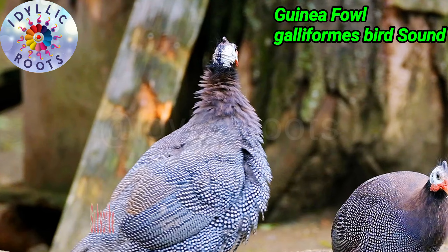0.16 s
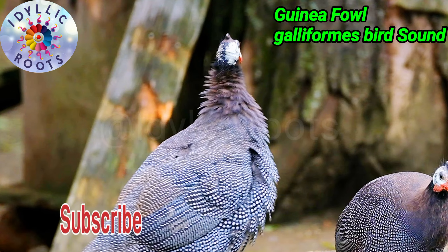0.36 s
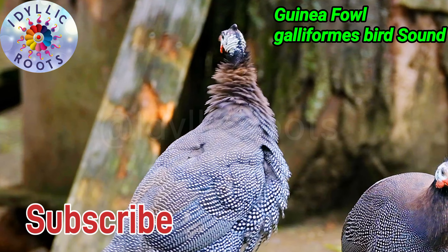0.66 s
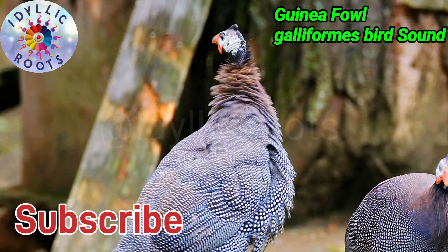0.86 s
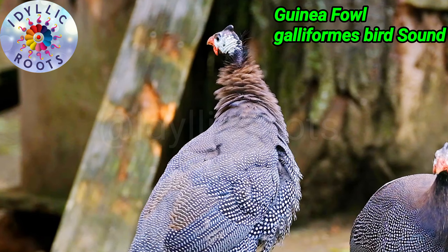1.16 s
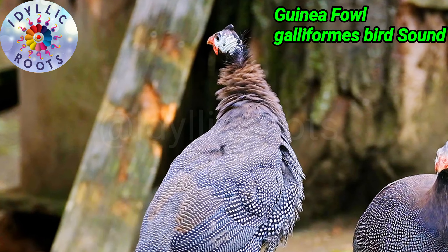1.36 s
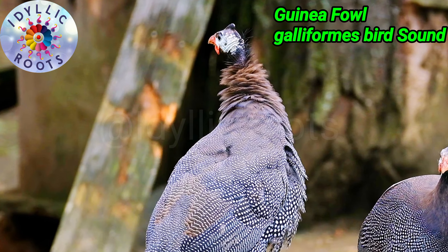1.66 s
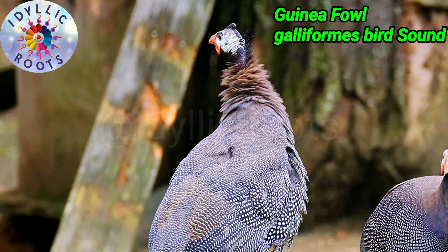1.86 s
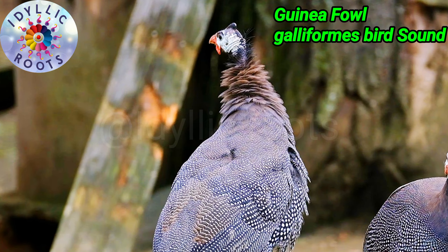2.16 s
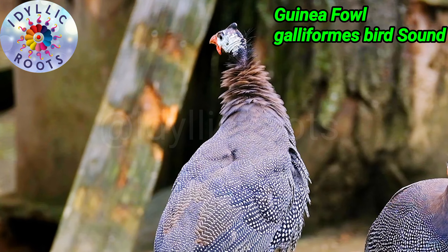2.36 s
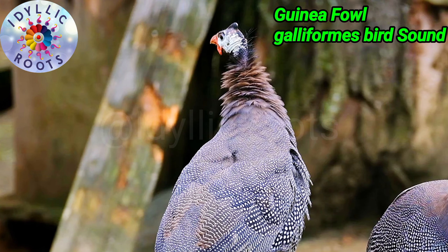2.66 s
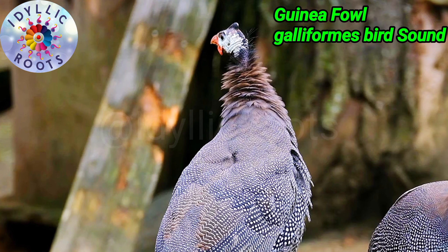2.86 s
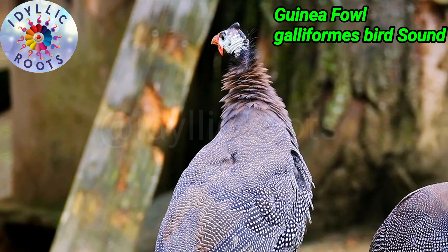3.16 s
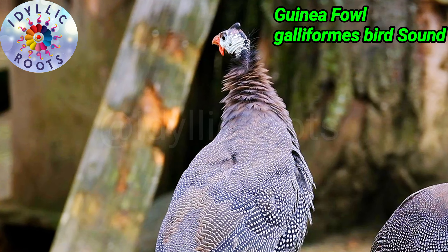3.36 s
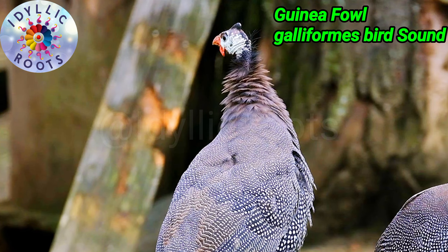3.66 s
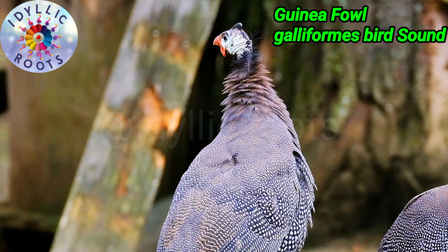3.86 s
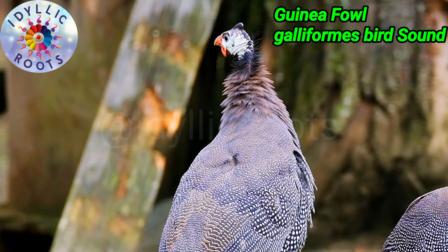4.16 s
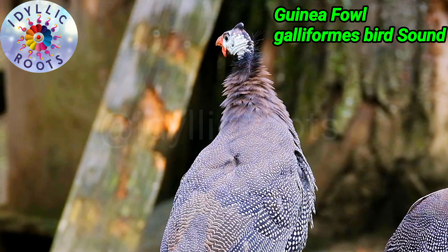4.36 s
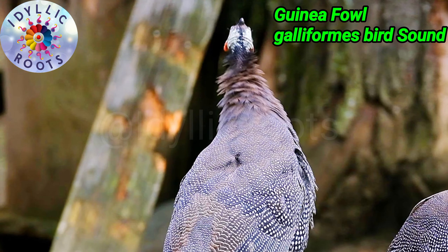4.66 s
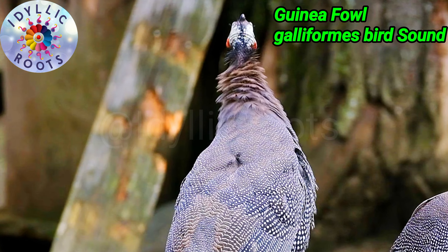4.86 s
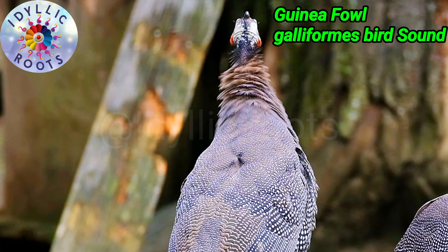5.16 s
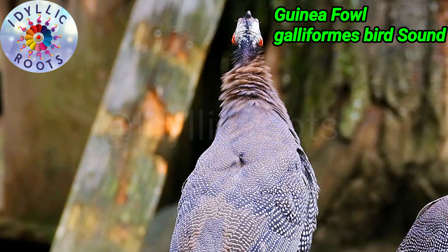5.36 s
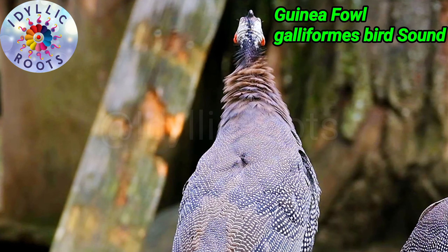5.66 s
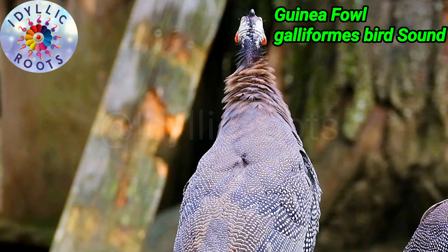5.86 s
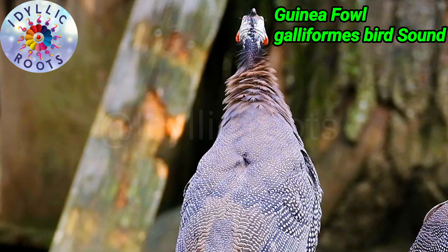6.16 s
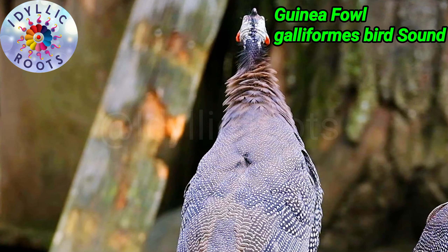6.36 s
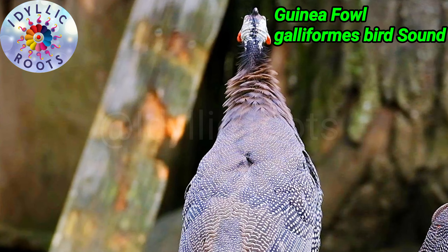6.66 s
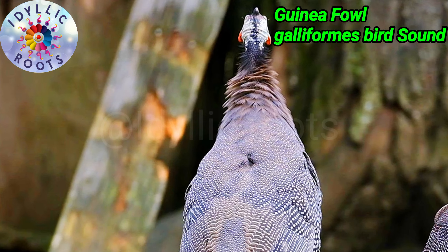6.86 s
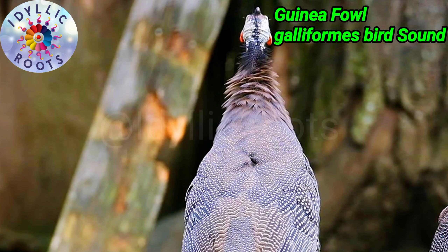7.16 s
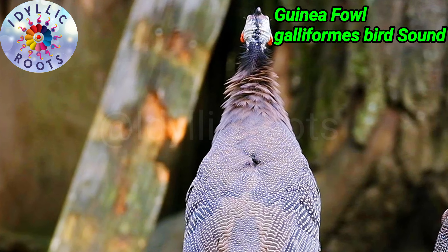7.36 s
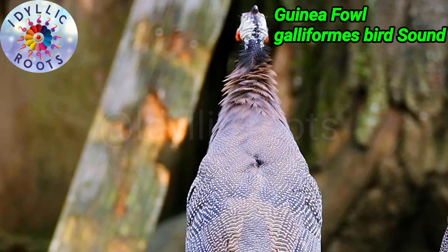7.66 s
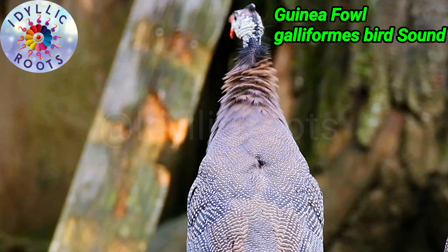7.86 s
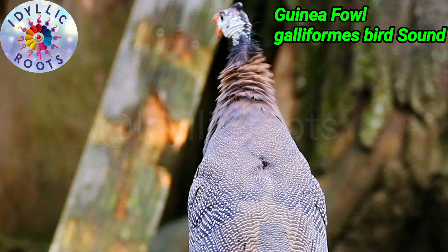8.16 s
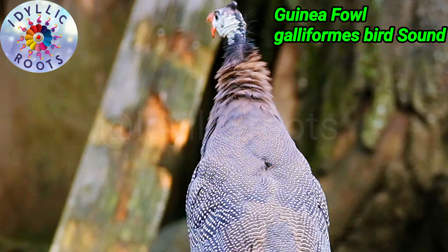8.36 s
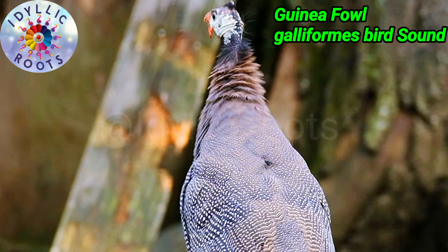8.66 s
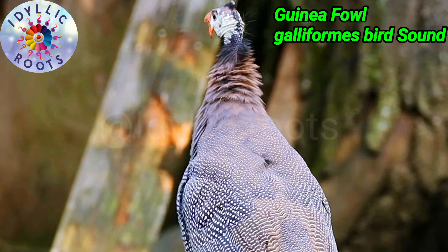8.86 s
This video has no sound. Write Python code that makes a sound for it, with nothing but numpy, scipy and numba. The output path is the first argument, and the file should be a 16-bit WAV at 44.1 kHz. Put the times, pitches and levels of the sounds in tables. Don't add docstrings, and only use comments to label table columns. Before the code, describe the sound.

A guineafowl close by repeats harsh, chopped rattling notes about four per second outdoors, pauses briefly, then resumes as a second bird answers with rasps.

```python
import sys
import numpy as np
from scipy import signal
from scipy.fft import rfft, irfft
from scipy.io import wavfile
from scipy.ndimage import uniform_filter1d, minimum_filter1d
from numba import njit

SR = 44100
rng = np.random.default_rng(int(sys.argv[2]) if len(sys.argv) > 2 else 0)


def gain_from_decibels(decibels):
    exponent = np.asarray(decibels, float) / 20
    return 10 ** exponent


def output_pcm(signal):
    pcm = np.clip(np.atleast_2d(signal).T, -1, 1) * 32767
    wavfile.write(sys.argv[1], SR, np.round(pcm).astype(np.int16))


N = 396900
T = np.arange(N) / SR

# t/s, throat f/Hz at the end of a note, treble level/dB from facing the microphone
POSTURE = [(0, 1700, -0.7), (1.8, 1640, 0), (2.2, 1840, 1), (2.8, 1649, -0.5), (3.3, 1661, 4),
           (3.7, 1807, -8), (4.4, 1820, -11), (5.1, 1984, -5), (5.7, 1819, -5), (6.1, 2060, -3.5),
           (6.9, 2104, -6.5), (7.15, 1790, -1), (7.7, 1870, -6), (9, 1830, -9)]


def colour(x, points):
    hz, db = np.transpose(points)
    gain_db = np.interp(np.log(np.linspace(1, SR / 2, 1025)), np.log(hz), db)
    cepstrum = irfft(np.log(gain_from_decibels(gain_db)))
    cepstrum[1:1024] *= 2
    cepstrum[1025:] = 0
    return signal.fftconvolve(x, irfft(np.exp(rfft(cepstrum))))[:N]


def above(x, hz):
    share = np.clip((np.fft.rfftfreq(N, 1 / SR) / hz - .93) / .14, 0, 1)
    return irfft(rfft(x) * share, N)


def unit(x):
    return x / np.sqrt(np.mean(x ** 2))


def walk(rate_hz):
    hold = int(SR / rate_hz)
    steps = np.repeat(rng.standard_normal(N // hold + 1), hold)
    return unit(uniform_filter1d(steps, hold)[:N])


@njit
def svf(x, hz, width_hz):
    y, band, low = np.empty(len(x)), 0., 0.
    for i in range(len(x)):
        g, damping = np.tan(np.pi * hz[i] / SR), width_hz / hz[i]
        v = (band + g * (x[i] - low)) / (1 + g * (g + damping))
        band, low, y[i] = 2 * v - band, low + 2 * g * v, damping * v
    return y


def tail(t60_s, length_s=.6):
    t = T[:int(length_s * SR)]
    return rng.standard_normal(len(t)) * gain_from_decibels(-60 * t / t60_s) * np.sqrt(np.log(1000) / t60_s / SR)


def membrane(hz, jitter, scatter_db, duty):
    phase = np.cumsum(hz * (1 + jitter * walk(300))) / SR
    size = gain_from_decibels(scatter_db * rng.standard_normal(N // 40))[phase.astype(int)]
    return phase, size * np.exp(-(phase % 1) / duty)


def flock():
    # t/s, level/dB
    flock_level = [(0, -40), (.2, -32.5), (.9, -36.5), (1.32, -41.5), (1.9, -36.5), (2.3, -38),
                   (3.0, -42.5), (3.41, -52), (3.69, -65), (3.72, -31.5), (3.96, -24), (4.15, -27.5),
                   (4.5, -28), (4.75, -32), (6, -35), (6.4, -31), (7.6, -30.5), (9, -30)]
    # f/Hz, level/dB
    flock_colour = [(1100, -18), (1400, -17), (1600, -3), (1760, -6), (1950, 0), (2100, -4), (2300, -14),
                    (2550, -11), (2850, -16), (3250, -10), (3900, -9), (4250, -14), (4700, -11),
                    (7100, -26)]
    db = np.interp(T, *np.transpose(flock_level))
    voices = sum(membrane(hz + 0 * T, .02, 3, .05)[1] * gain_from_decibels(4 * walk(9)) for hz in (318, 385, 394))
    blur = signal.fftconvolve(np.diff(voices, prepend=0), tail(.079))[:N]
    breath = .7 * rng.standard_normal(N)
    drone = unit(colour(unit(blur) + breath, [(600, -24)] + flock_colour + [(7800, -66)]))
    hiss_colour = [(6000, -19), (8000, -8.5), (12000, -4.5), (14500, -14), (15500, -47)]
    hiss = unit(colour(rng.standard_normal(N), hiss_colour))
    murmur = unit(colour(rng.standard_normal(N), [(200, -31.5), (350, .5), (800, 0), (1200, -33)]))
    hiss += gain_from_decibels(-5.5) * murmur
    hiss_db = -54 + .96 * (db + 33.5) + 1.2 * walk(7.2)
    return drone * gain_from_decibels(db + 2.2 * walk(6.4)) + hiss * gain_from_decibels(hiss_db)


def air():
    # f/Hz, level/dB
    air_colour = [(18, -65), (30, -43), (123, -6.5), (663, -24), (727, -14), (1180, -4.5), (1270, -3),
                  (5680, -12), (6090, -11), (7500, -10), (9750, -69), (16500, -120)]
    return gain_from_decibels(-48 + .98 * walk(2.4)) * unit(colour(rng.standard_normal(N), air_colour))


def insect():
    return gain_from_decibels(-50.5) * unit(svf(rng.standard_normal(N), 6350 + 60 * walk(4), 200.)) * (T < 3.71)


def whistle(hz, chop, waver, overtones):
    phase = 2 * np.pi * np.cumsum(hz * (1 + waver * walk(250))) / SR
    tone = 0
    for k, db in overtones:
        swing_db = 1.5 if k == 1 else 3.5
        tone = tone + gain_from_decibels(db + swing_db * walk(90)) * np.sin(k * phase)
    puff = membrane(340 + 0 * hz, .03, 1.5, .5)[1]
    return unit(tone * (1 + chop * unit(puff - puff.mean())))


def rattle(hz, throat_hz, jitter, rough):
    # f/Hz, width/Hz, level/dB
    head_modes = [(794, 140, -38.5), (1283, 420, -17.5), (7600, 3600, -16.5), (2437, 200, -9),
                  (3210, 850, -4), (3930, 205, -8), (4520, 162, -8), (5068, 154, -13), (5305, 130, -14.5),
                  (6130, 1050, -10), (8660, 590, -19.5), (10590, 610, -14.5), (11640, 200, -18),
                  (12270, 370, -13.5), (13670, 1600, -20)]
    phase, puff = membrane(hz, jitter, 1.4, 1.0)

    def swing():
        return gain_from_decibels(3 * walk(60))

    snap = unit(np.maximum(np.diff(puff, prepend=0), 0))
    drive = snap + rough * unit(puff * rng.standard_normal(N))
    head = np.zeros(N)
    for k, (f_hz, width_hz, db) in enumerate(head_modes):
        mode = unit(svf(drive, f_hz * (1 + .018 * walk(30)), 1. * width_hz))
        head += (-1) ** k * gain_from_decibels(db) * swing() * mode
    throat = svf(svf(drive, throat_hz, 310.), throat_hz, 310.)
    hum = np.sin(2 * np.pi * phase)
    grunt = np.sin(6 * np.pi * phase) * swing()
    return unit(head), unit(throat * swing()), hum, grunt


def bird(notes, overtones):
    # t/s, squeak f/Hz, squeak level/dB re whistle, squeak length/s, neck grunt level/dB re rattle
    lead_in = [
        (0, 3700, -17, 0.0033, -65),
        (3.5, 3673, -54, 0.0053, -28),
        (3.7, 3344, -5, 0.0062, -24.5),
        (9, 3340, 0, 0.0056, -24),
    ]
    # t/s, throat ring at note end as share of rattle, attack/s
    settling = [
        (0, .5, .007),
        (3.5, .42, .007),
        (3.7, .8, .011),
        (9, .8, .011),
    ]
    tone_gain, head_gain, throat_gain, hum_gain, grunt_gain, lead, sag, flare = np.zeros((8, N))
    lead_s, lead_hz, lead_db, lead_length, grunt_db = np.transpose(lead_in)
    settle_s, ring_share, attack_s = np.transpose(settling)
    for s, length, _, tone_db, _, rattle_db in notes:
        at = slice(int((s - .03) * SR), int((s + .098) * SR))
        t = T[at] - s
        ring, attack = np.interp(s, settle_s, ring_share), np.interp(s, settle_s, attack_s)
        rise = np.clip((t + attack - .004) / attack, 0, 1)
        gate = rise * gain_from_decibels(-900 * np.maximum(t - length, 0))
        late_fall = gain_from_decibels(-1400 * np.maximum(t - length - .01, 0))
        tone_shape = np.interp(t / length, [0, .4, .52, 1], [1.25, .8, .22, .12])
        tone_gain[at] += gain_from_decibels(tone_db) * gate * tone_shape
        head_gain[at] += gain_from_decibels(rattle_db) * gate * np.interp(t / length, [0, .4, 1], [.75, .75, .56])
        flare_db = tone_db - 4.5 + 2.5 * rng.standard_normal()
        flare_shape = np.clip((t + .0066) / .0052, 0, 1) * np.exp(-np.maximum(t, 0) / .014)
        flare[at] += gain_from_decibels(flare_db) * flare_shape
        throat_shape = np.interp(t / length, [0, .4, .6, 1], [.7, .5, .8 * ring, ring])
        throat_gain[at] += gain_from_decibels(rattle_db) * rise * late_fall * throat_shape
        grunt_rise = np.clip(t / .0048 + 2.4, 0, 1)
        grunt_gain[at] += gain_from_decibels(rattle_db + np.interp(s, lead_s, grunt_db)) * grunt_rise * late_fall
        hum_gain[at] += gain_from_decibels(rattle_db - 26.5) * gate * np.clip(t / length - .2, 0, .7)
        swell = np.exp(np.minimum(t, 0) / np.interp(s, lead_s, lead_length)) * np.clip(1 - t / .021, 0, 1)
        lead[at] += gain_from_decibels(tone_db + np.interp(s, lead_s, lead_db)) * swell * (t > -.016)
        droop = np.clip((t - length + .008) / .025, 0, 1) * (t < length + .04)
        sag[at] = np.maximum(sag[at], droop)

    s, length, tone_hz, _, throat_hz, _ = np.transpose(notes)
    pitch = np.interp(T, np.ravel([s, s + length], "F"), np.ravel([1.005 * tone_hz, .98 * tone_hz], "F"))
    knots_s = np.ravel([s, s + .44 * length, s + .52 * length, s + length], "F")
    knots_hz = np.ravel([1.224 * tone_hz, 1.215 * tone_hz, throat_hz, throat_hz], "F")
    throat_hz = np.interp(T, knots_s, knots_hz) * (1 - .05 * sag)
    membrane_hz = (384 + 4 * walk(6)) * (1 - .1 * sag)
    head, throat, hum, grunt = rattle(membrane_hz, throat_hz, .018, .6)
    squeak_hz = np.interp(T, lead_s, lead_hz) * (1 + .03 * walk(90))
    squeak = np.sin(2 * np.pi * np.cumsum(squeak_hz) / SR) * (1 + .7 * walk(700))
    octave = np.sin(4 * np.pi * np.cumsum(pitch * (1 + .012 * walk(200))) / SR) * gain_from_decibels(3 * walk(300))
    out = flare * octave + tone_gain * whistle(pitch, .11, .008, overtones) + lead * squeak
    return out + head_gain * head + throat_gain * throat + hum_gain * hum + grunt_gain * grunt


def voiced(rows, throat_hz):
    return [(s, length, hz, db, throat_hz(s), -7 + .98 * (db + 10)) for s, length, hz, db in rows]


def near_bird():
    # t/s, length/s, whistle f/Hz, effort level/dB
    first_bout = [(0.092, .075, 1593, -10.5), (0.391, .072, 1547, -9), (0.697, 0.075, 1606, -11),
                  (0.971, 0.074, 1610, -11), (1.374, 0.067, 1609, -10.5), (1.771, 0.065, 1567, -9),
                  (2.042, .065, 1604, -10), (2.279, 0.073, 1621, -12), (2.527, .072, 1640, -9),
                  (2.787, 0.075, 1613, -11.5), (3.034, 0.072, 1635, -12), (3.27, .069, 1586, -13.5)]
    # t/s, length/s, whistle f/Hz, effort level/dB
    second_bout = [(3.76, .075, 1656, -11), (4.031, .061, 1656, -10.5), (4.33, .062, 1675, -7.5),
                   (4.608, .062, 1672, -11), (4.839, .067, 1670, -8), (5.079, .062, 1661, -7.5),
                   (5.333, .059, 1687, -8), (5.58, .06, 1674, -8), (5.849, .061, 1663, -8.5),
                   (6.1, .046, 1695, -5), (6.377, .069, 1682, -7), (6.634, .074, 1689, -3),
                   (6.878, .069, 1686, -1), (7.144, .074, 1678, -5.5), (7.376, .08, 1705, -7),
                   (7.651, .071, 1693, -7.5), (7.906, .061, 1665, -6), (8.158, .06, 1675, -6),
                   (8.416, .069, 1655, -8.5), (8.66, .055, 1672, -7), (8.93, .06, 1660, -8)]
    # multiple, level/dB
    full_overtones = [(1, 4), (2, -8), (3, -13.5), (4, -17), (5, -41)]
    posture_s, throat_hz, _ = np.transpose(POSTURE)
    notes = voiced(first_bout + second_bout, lambda at: np.interp(at, posture_s, throat_hz))
    return bird(notes, full_overtones)


def peeps():
    # t/s, level/dB
    far_peep = (.065, 2450, 2290), [(.305, -34)]
    high_peep = (.035, 3290, 3260), [(.308, -36)]
    tick = (.005, 1500, 350), [(1.131, -27)]
    chick = (.05, 1590, 860), [(2.43, -45), (2.72, -45), (3.165, -41), (3.432, -43), (3.546, -41),
             (3.672, -41)]
    small_grunt = (0.055, 1090, 1145), [(3.745, -37), (4.0, -34), (4.58, -33), (6.06, -26), (6.62, -19.5),
                   (7.358, -18), (7.635, -23), (7.879, -28), (8.625, -29.5), (8.828, -27), (8.9, -30)]
    thud = (.034, 480, 120), [(4.486, -33)]
    chirr = (.04, 1410, 1365), [(6.245, -24)]
    yelp_low = (0.038, 1150, 1045), [(6.428, -15), (6.818, -20.5), (7.541, -39), (7.777, -49)]
    yelp = (0.025, 2190, 2060), [(6.447, -3), (6.82, -5.5), (7.75, -15)]
    knock = (0.0307, 590, 323), [(6.499, -38.5), (6.743, -33)]
    kinds = (far_peep, high_peep, tick, chick, small_grunt, thud, chirr, yelp_low, yelp, knock)
    out = np.zeros(N)
    for (length, from_hz, to_hz), events in kinds:
        n = int(length * SR)
        glide = np.sin(2 * np.pi * np.cumsum(np.geomspace(from_hz, to_hz, n)) / SR)
        for s, db in events:
            start = int(s * SR)
            out[start:start + n] += gain_from_decibels(db) * np.hanning(n) ** .31 * glide
    return out * (1 + .55 * walk(350))


def breeze():
    # t/s, length/s, level/dB
    puffs = [
        (3.8, 0.072, -56),
        (4.55, 0.1198, -56),
        (5.35, .1, -56),
        (6.7, 0.16, -52),
        (7.15, 0.27, -55),
        (8.92, 0.17, -46.5),
    ]
    gain = sum(gain_from_decibels(db) * np.exp(-((T - s) / length) ** 2) for s, length, db in puffs)
    rumble = unit(colour(rng.standard_normal(N), [(20, -7), (150, -1.5), (280, -3), (500, -27)]))
    return gain * gain_from_decibels(3.6 * walk(25)) * rumble


def rasps():
    # t/s, length/s, membrane f/Hz, level/dB, throat f/Hz
    held_rasps = [
        (6.05, 0.2, 368.4, -15, 2051),
        (6.93, .29, 367, -12, 2126),
        (7.231, 0.0502, 362, -19, 2090),
        (7.447, .095, 377, -20, 2080),
        (8.07, .09, 387.2, -21, 2020),
        (8.318, 0.12, 386.7, -22, 1850),
    ]
    gain, hz, throat_hz = np.zeros(N), np.full(N, 370.), np.full(N, 2000.)
    for s, length, held_hz, db, open_hz in held_rasps:
        at = slice(int(s * SR), int((s + length + .15) * SR))
        t = T[at] - s
        over = np.maximum(t - length, 0)
        gain[at] += np.clip(t / .02, 0, 1) * gain_from_decibels(db - 13 * t - 330 * over)
        hz[at], throat_hz[at] = held_hz - 350 * over, open_hz
    head, throat, hum, grunt = rattle(hz, throat_hz, .012, .55)
    head = colour(head, [(1100, 7), (2600, 4), (3500, -2), (7000, -5), (9000, -12)])
    return gain * (gain_from_decibels(-2) * head + gain_from_decibels(1) * throat + gain_from_decibels(-29.5) * hum + gain_from_decibels(-23) * grunt)


def second_bird():
    # t/s, length/s, whistle f/Hz, effort level/dB
    answers = [(6.068, 0.028, 1748, -19.5), (6.809, .033, 1775, -18.5), (7.217, .02, 1677, -18),
               (7.735, .042, 1733, -21.5), (7.99, .068, 1710, -15.5), (8.246, .057, 1700, -15),
               (8.497, .07, 1715, -14.5), (8.855, .012, 1720, -18), (8.889, .058, 1750, -15)]
    # multiple, level/dB
    thin_overtones = [(1, -3), (2, -1.5), (3, -.5), (4, -15), (5, -30)]
    return bird(voiced(answers, lambda at: 2150), thin_overtones)


def face(voice):
    posture_s, _, facing_db = np.transpose(POSTURE)
    facing_db = np.interp(T, posture_s, facing_db)
    high, treble = above(voice, 2800), above(voice, 7200)
    upper_gain = gain_from_decibels(1.5 + .1553 * facing_db)
    return voice + (high - treble) * (upper_gain - 1) + treble * (gain_from_decibels(facing_db) - 1)


def scene():
    # f/Hz, side level/dB re mid
    side_colour = [(60, -24), (110, -21), (200, -21), (380, -33), (700, -11), (1290, -35.5), (2370, -44),
                   (4380, -33.5), (8090, -24.5), (14900, -52)]
    voice = face(near_bird() + second_bird() + rasps()) + peeps()
    smear = signal.fftconvolve(above(voice, 900), tail(.025, .03))[:N]
    voice = gain_from_decibels(-2) * (voice + gain_from_decibels(-5) * smear)
    dull = colour(voice, [(400, 3.5), (1000, -3.5), (4000, -4.5), (12000, -15.5)])
    wall = np.roll(dull, int(.128 * SR)) * gain_from_decibels(-26)
    yard = signal.fftconvolve(dull, tail(.22))[:N] * gain_from_decibels(-12)
    mid = voice + wall + yard + flock() + air() + insect() + breeze()
    side = colour(np.roll(mid, int(.03 * SR)), side_colour)
    return np.array([mid + side, mid - side])


def band_limit(x):
    return signal.sosfilt(signal.butter(12, 15540, fs=SR, output="sos"), x)


def record(dry):
    peak = np.abs(dry).max(axis=0) + 1e-9
    room_left = minimum_filter1d(np.minimum(1, .95 / peak), size=160)
    held = dry * uniform_filter1d(room_left, size=160) ** .85
    low_pass = signal.ellip(8, .2, 70, 15480, fs=SR, output="sos")
    mix = signal.sosfilt(low_pass, np.clip(held, -.93, .93))
    return band_limit(mix)


dry = scene()
out = record(dry)
output_pcm(out)
```